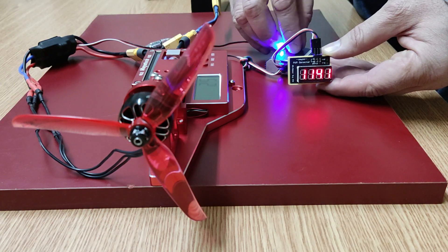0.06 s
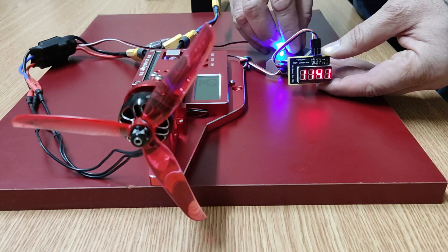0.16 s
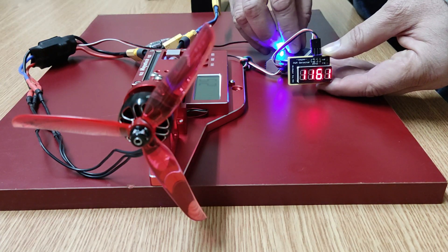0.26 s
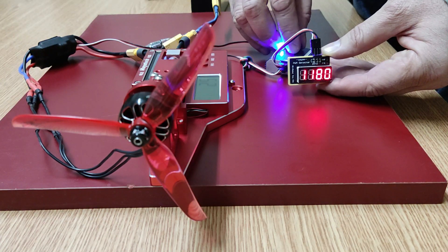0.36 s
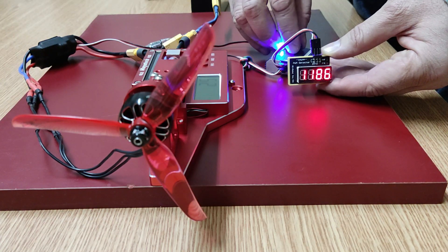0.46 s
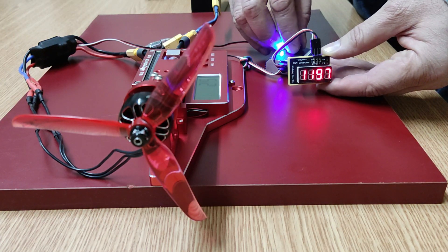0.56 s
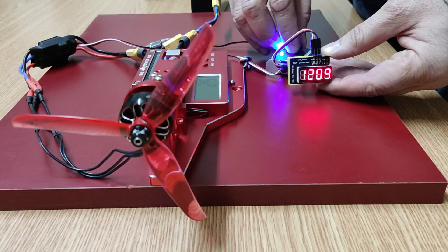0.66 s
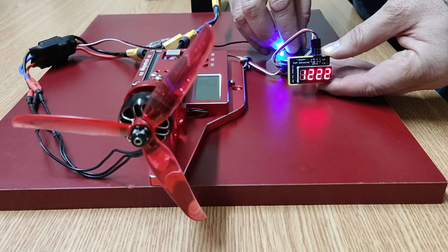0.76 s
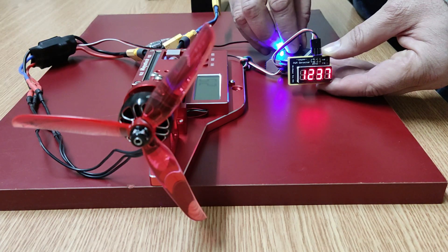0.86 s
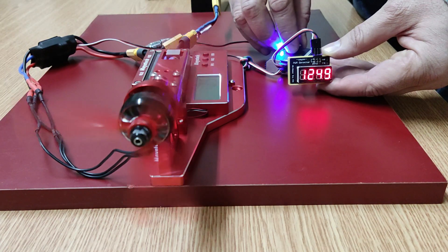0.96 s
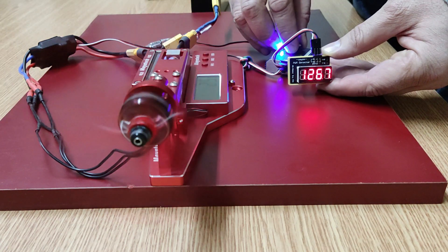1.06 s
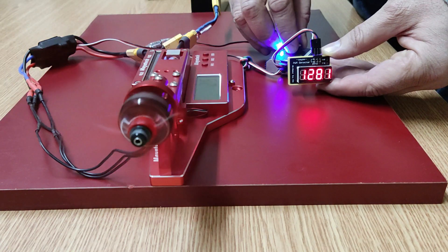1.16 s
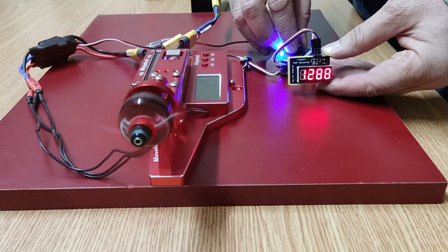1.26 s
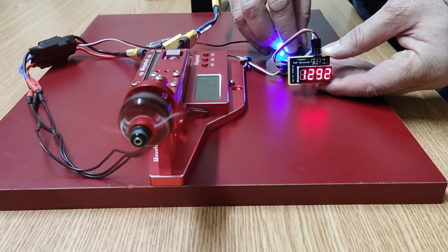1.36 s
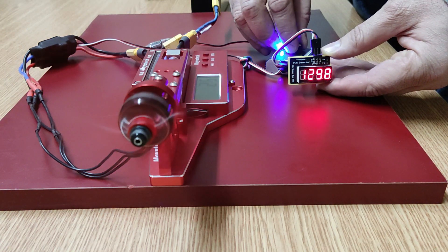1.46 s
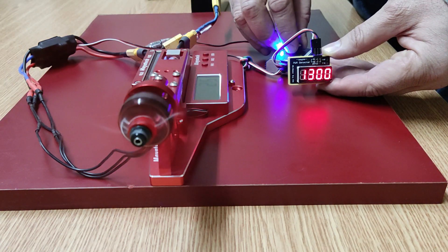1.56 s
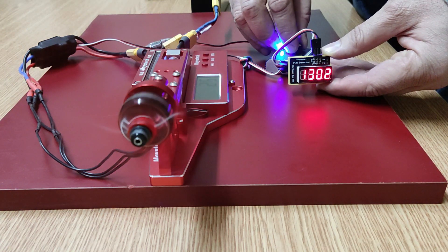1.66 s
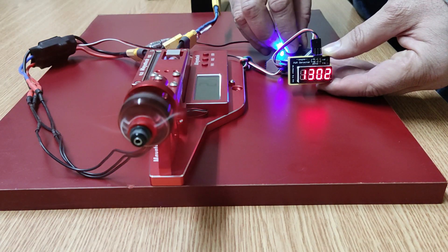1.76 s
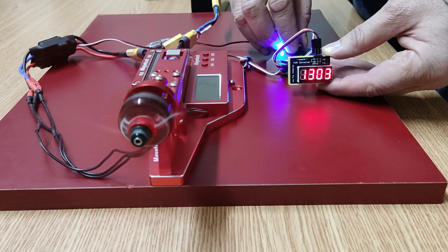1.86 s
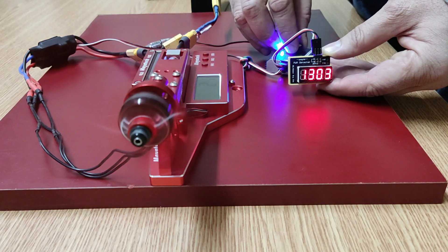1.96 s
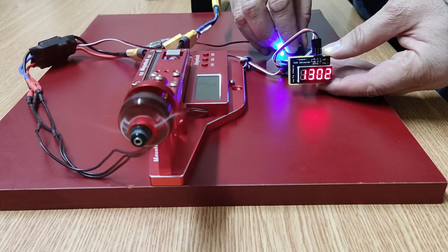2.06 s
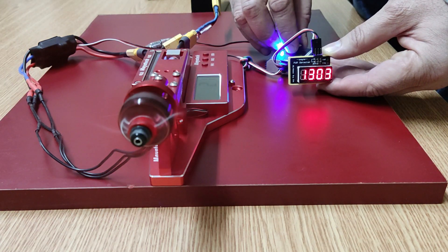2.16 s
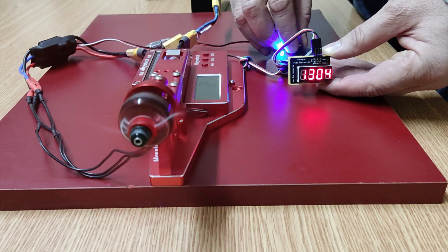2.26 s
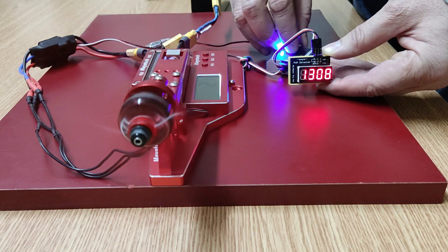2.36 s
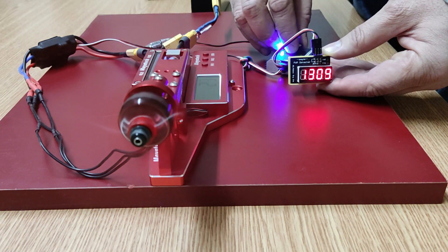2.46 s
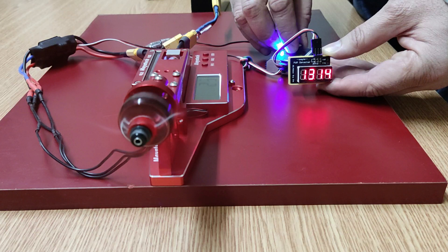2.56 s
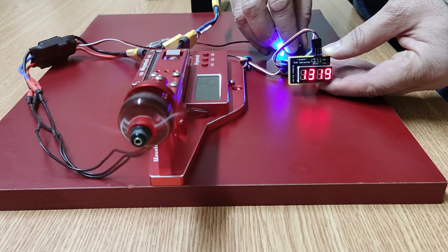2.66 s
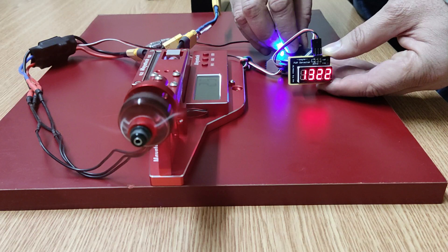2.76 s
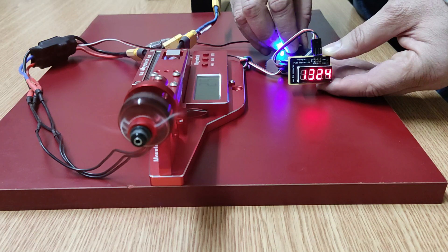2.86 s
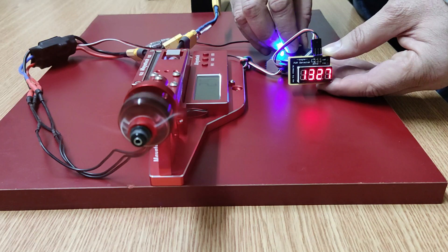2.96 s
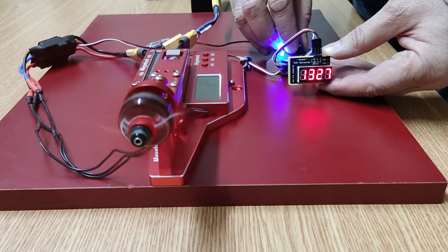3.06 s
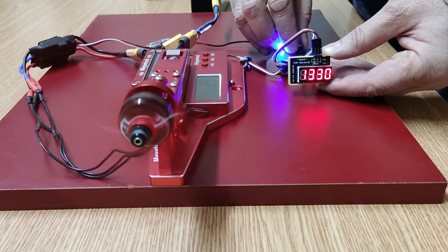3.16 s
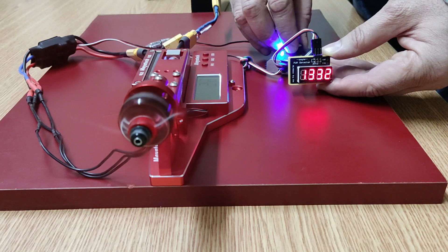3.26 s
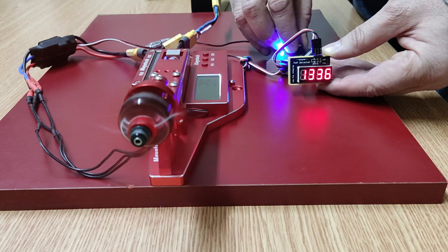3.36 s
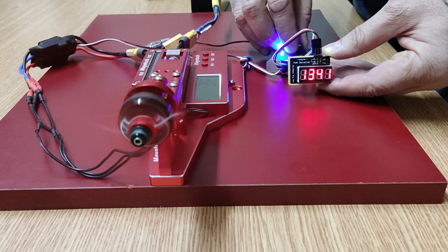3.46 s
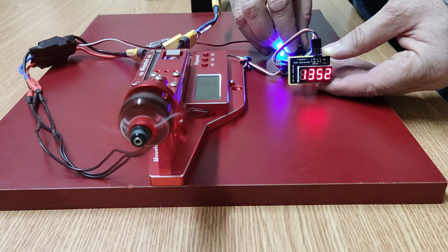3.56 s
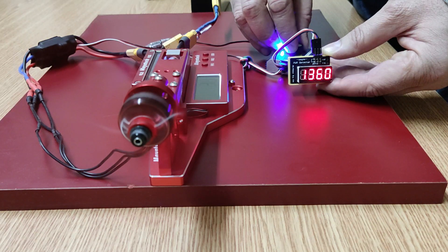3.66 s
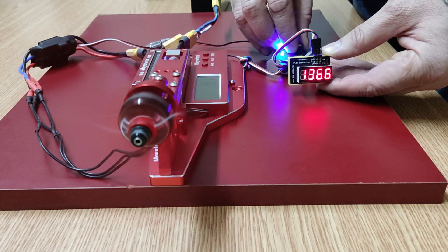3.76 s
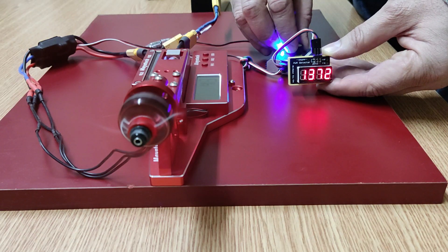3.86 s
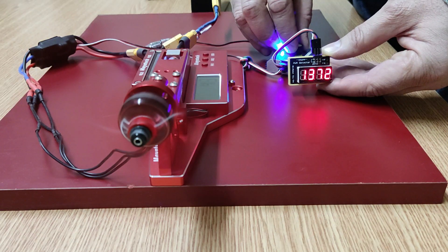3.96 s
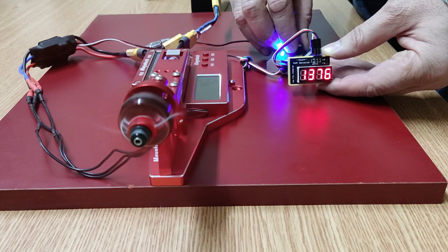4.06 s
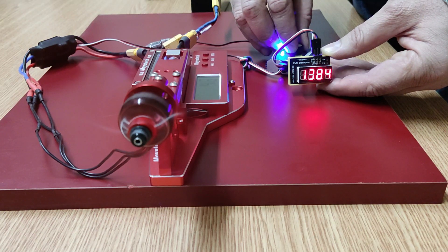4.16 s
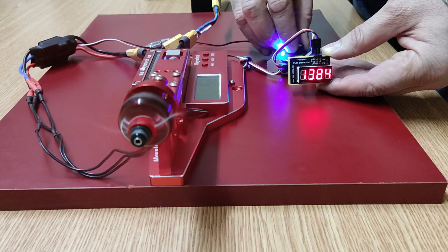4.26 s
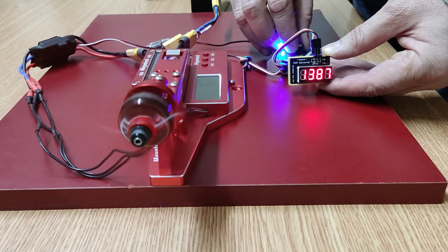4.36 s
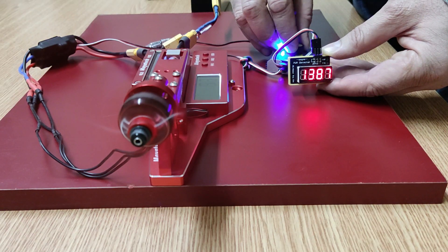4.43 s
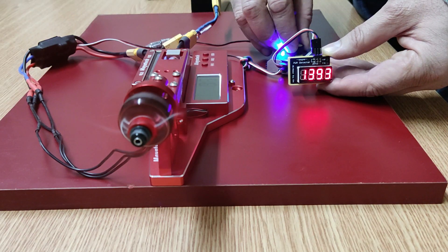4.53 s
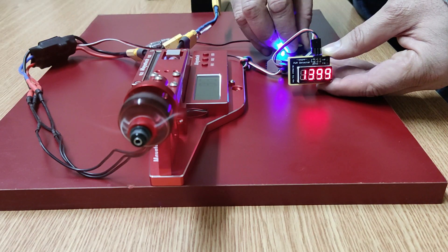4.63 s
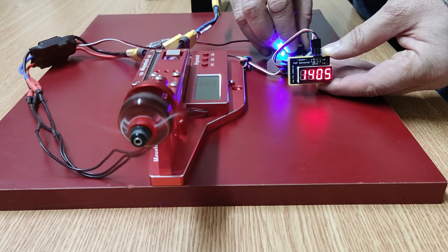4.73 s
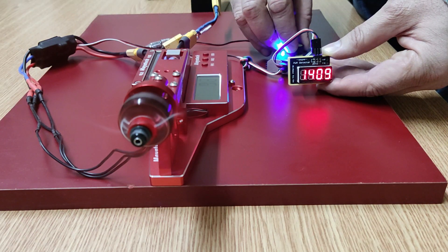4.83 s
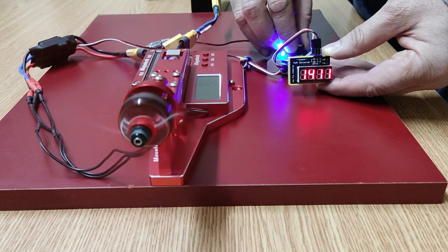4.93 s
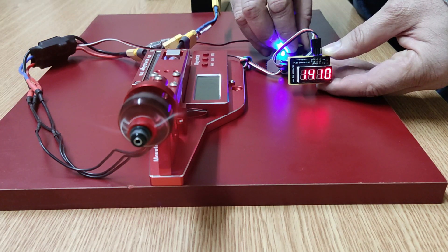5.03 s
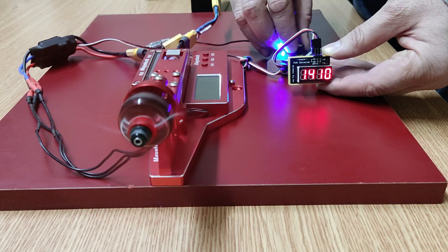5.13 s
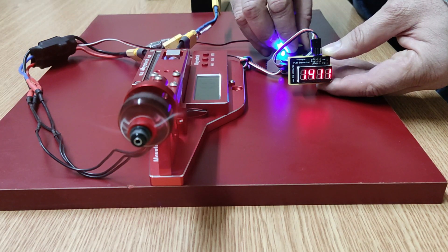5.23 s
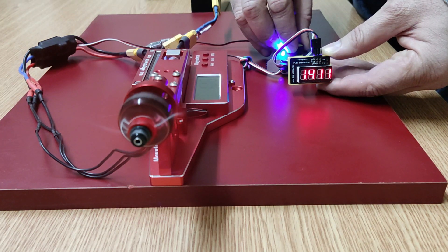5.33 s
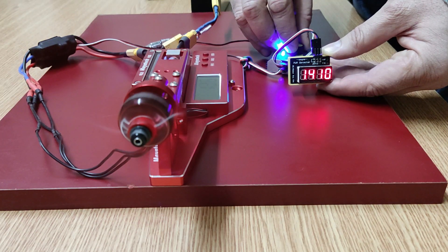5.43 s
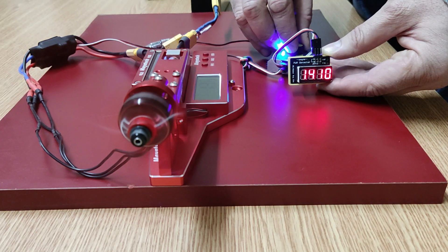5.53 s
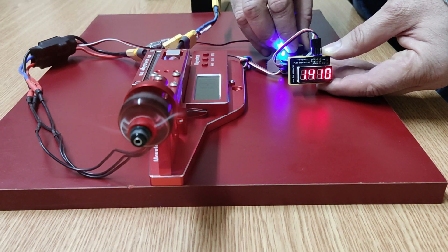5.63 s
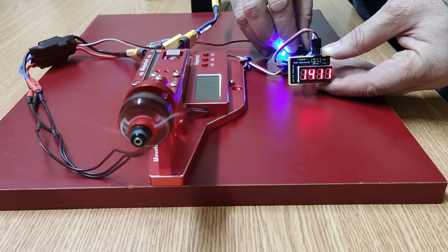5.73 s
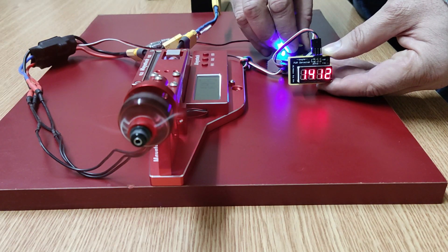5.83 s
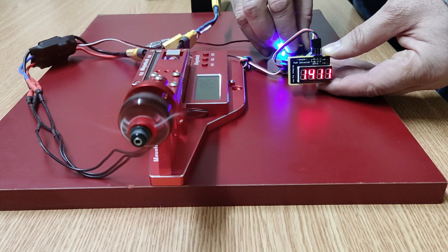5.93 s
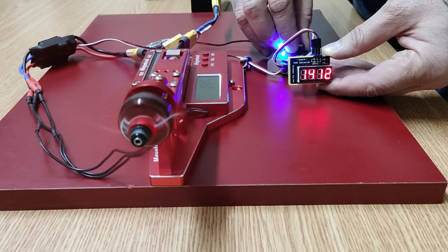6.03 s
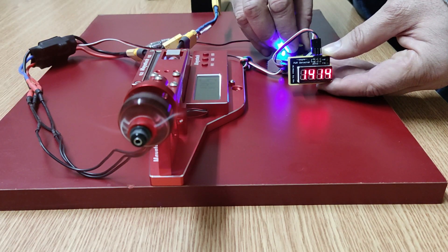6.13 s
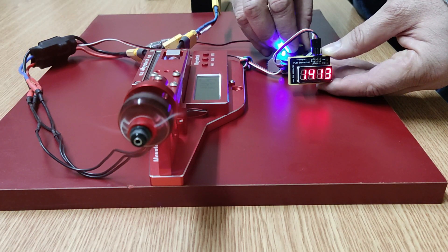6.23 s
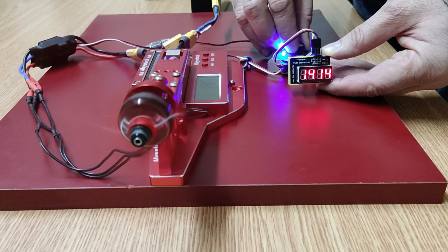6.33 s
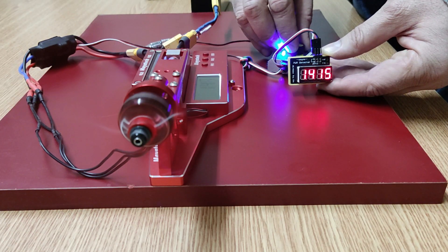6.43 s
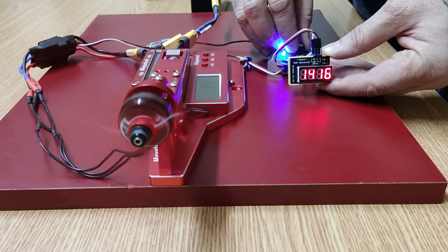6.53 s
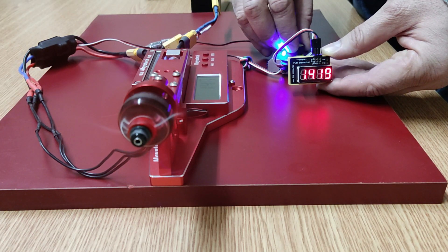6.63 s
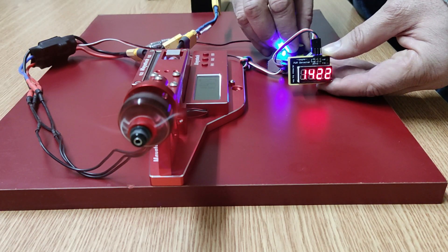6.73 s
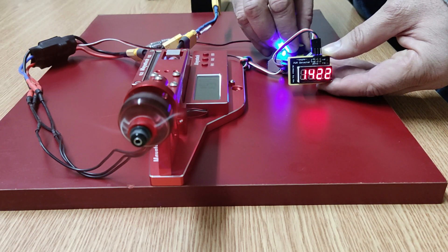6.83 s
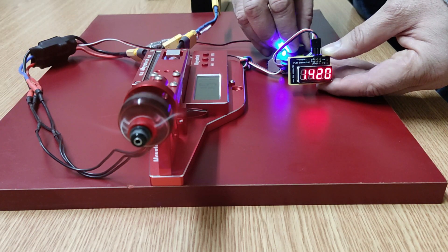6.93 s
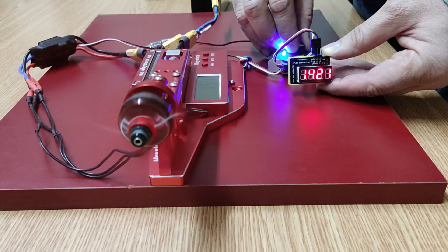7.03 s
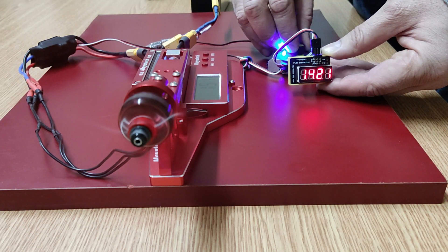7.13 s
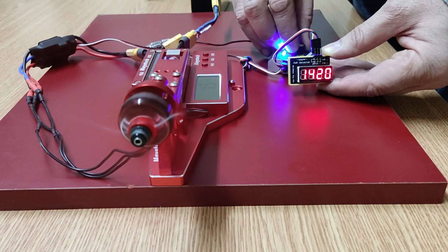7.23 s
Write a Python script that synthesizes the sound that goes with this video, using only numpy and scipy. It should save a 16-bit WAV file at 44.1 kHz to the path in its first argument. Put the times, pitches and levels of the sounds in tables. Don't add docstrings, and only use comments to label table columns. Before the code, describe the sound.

Near silence in a small room, then a little brushless motor ticks, shudders and snaps into rotation close to the microphone. A high, gritty controller squeal stays almost fixed in pitch while gliding tones around it rise with speed. The propeller adds a low throb, dull wash over the stand and increasingly strong airy hiss. After several seconds of climbing, it holds a shrill, windy high speed without winding down.

```python
import sys
import numpy as np
from scipy import signal
from scipy.fft import rfft, irfft, next_fast_len
from scipy.io import wavfile
from scipy.ndimage import uniform_filter1d

SR = 44100
rng = np.random.default_rng(int(sys.argv[2]) if len(sys.argv) > 2 else 0)


def store_wav(level_fs):
    pcm = np.round(np.clip(np.atleast_2d(level_fs), -1, 1) * 32767)
    wavfile.write(sys.argv[1], SR, pcm.T.astype(np.int16))


def undo_db(level):
    steps = np.asarray(level, float) / 20
    return 10 ** steps


N = 321489
SIZE = next_fast_len(N + 8192)
LOCK_S, THRUST_S = 1.341, 1.447


def level(x, db):
    return x * undo_db(db) / np.sqrt(np.mean(x ** 2))


def unit_power(gain):
    return gain / np.sqrt(np.mean(gain ** 2))


def walk(rate):
    knots = rng.standard_normal(int(N / SR * rate) + 3)
    place = np.arange(N) * rate / SR + rng.random()
    return 1.156 * np.interp(place, np.arange(len(knots)), knots)


def curves(table):
    s, *columns = np.transpose(table)
    return [np.interp(np.arange(N) / SR, s, c) for c in columns]


def bins():
    return np.maximum(np.fft.rfftfreq(SIZE, 1 / SR), 1)


def on_log(table):
    hz, *columns = np.transpose(table)
    return [np.interp(np.log(bins()), np.log(hz), c) for c in columns]


def pan(db):
    return undo_db(np.array([db, -db]) / 2)


def peak(hz, width):
    return 1 / (1 + ((bins() - hz) / (width / 2)) ** 2)


def shaped(x, gain):
    left_lag_s = .00015
    lag = np.exp(-2j * np.pi * bins() * left_lag_s * np.array([[1], [0]]))
    return irfft(rfft(x, SIZE) * gain * lag, SIZE)[:, :N]


def noise_pair(like):
    shared, *own = rng.standard_normal((3, N))
    like = np.clip(like, 0, 1)
    return np.sqrt(like) * shared + np.sqrt(1 - like) * np.array(own)


def tone(hz, db, pan_db, wobble_db, rate=14):
    cycles = np.cumsum(hz) / SR + rng.random()
    wave = np.sqrt(2) * np.sin(2 * np.pi * cycles) * (hz < 15900)
    loudness = undo_db(db + wobble_db * walk(rate))
    return wave * loudness * pan(pan_db + wobble_db * walk(.7 * rate))


def lines(turns, pitches, table, drive_db, wobble_db, rate=14):
    full_turns = 168
    octaves = np.log2(turns / full_turns)
    out = 0
    for hz, (db, pan_db, growth) in zip(pitches, table):
        out = out + tone(hz, db + growth * octaves + drive_db, pan_db, wobble_db, rate)
    return out


# start_s, speed_turns_per_s
THROTTLE = [(1.53, 60.2), (1.85, 68.8), (2.05, 71.7), (2.47, 73.2), (2.87, 87.4), (3.1, 94), (3.28, 95.8),
            (3.55, 103), (3.66, 109), (3.92, 126.8), (4.05, 132.5), (4.68, 151), (4.95, 161.8), (5.1, 164),
            (5.7, 165.3), (6.45, 168.2), (6.95, 173.5), (7.29, 173.9)]


def shaft(t):
    wake_s, wake_turns, drag_gain = 1.05, 15, 114
    snap_s, snap_gain = 1.33, 600
    overshoot_s, overshoot_turns, settle_s = 1.36, 15, .063
    inertia_s = .06
    running = uniform_filter1d(curves(THROTTLE)[0], int(inertia_s * SR), mode="nearest")
    since_lock = np.maximum(t - overshoot_s, 0)
    running = running + overshoot_turns * np.exp(-(since_lock / settle_s) ** 2)
    dragged = wake_turns + drag_gain * np.maximum(t - wake_s, 0)
    dragged = dragged + snap_gain * np.maximum(t - snap_s, 0)
    return np.minimum(dragged, running)


def law(turns, db, knee, below_db, above_db):
    idle_turns = THROTTLE[0][1]
    octaves = np.log2(np.maximum(turns, idle_turns) / knee)
    return db + np.where(octaves < 0, below_db, above_db) * octaves


# start_s, level_db
WAKE_CURRENT = [
    (1.045, -59),
    (1.056, -24),
    (1.1, -22),
    (1.17, -0.5),
    (1.22, -3.5),
    (1.339, -5),
]
# start_s, level_db
LOCK_CURRENT = [
    (1.339, -17),
    (1.343, 3),
    (1.363, 7),
    (1.368, -5.5),
    (1.442, -2),
    (1.452, 4),
    (2.2, 3),
]


def efforts(t, turns):
    current = np.where(t < LOCK_CURRENT[0][0], curves(WAKE_CURRENT)[0], curves(LOCK_CURRENT)[0])
    asleep = np.minimum(current - WAKE_CURRENT[1][1], 0)
    ripple = np.interp(turns, [137, 159], [0, -11.5]) - 0.05 * np.maximum(turns - 159, 0)
    jolt_end_s = 1.369
    jolt = 1.3 * np.maximum(current, 0) * (t < jolt_end_s)
    idle_db, bite_s = -19, .02
    idle = idle_db * np.clip((THRUST_S - t) / bite_s + .5, 0, 1)
    board_turns, board_width_turns, board_db = 154, 3, 7.5
    board = board_db / (1 + ((turns - board_turns) / (board_width_turns / 2)) ** 2)
    chop_db = -2.4 + current + ripple
    rattle_db = law(turns, -23, 102.5, 11.5, -3.5) + current + jolt
    hiss_db = law(turns, -18, 125.5, 16.5, -1.5) + idle + asleep
    wash_db = law(turns, -36, 107.5, 10, -3.5) + 0.31 * (current + jolt) + asleep + board
    return chop_db, rattle_db, hiss_db, wash_db


SIDEBAND_ORDERS = [-28, -14, -7, -3, -2, -1, 0, 1, 3, 6, 8, 10, 11, 12, 13, 14, 17, 21, 28, 39, 42]
# level_db, left_minus_right_db, growth_db_per_octave of speed
SIDEBAND_LEVELS = [(-45.4, -2.9, 5.2), (-33.7, -5.0, -1.3), (-57.0, -7.5, -4.2), (-29.4, 3.6, 3.3),
                   (-52.8, -0.7, -0.3), (-36.3, 6.0, 5.5), (-19.5, 21.5, 7.5), (-54.0, -11.0, -2.8),
                   (-37.7, 4.5, 5.9), (-36.5, 9.0, 11.0), (-58.3, -7.9, 0.4), (-55.9, 3.1, -3.0),
                   (-42.7, -11.9, 1.3), (-45.4, -9.9, 4.4), (-58.3, -5.5, -10.7), (-22.3, -1.4, 3.0),
                   (-53.2, -12.7, -1.4), (-42.8, -1.9, 8.6), (-63.7, -0.8, -15.3), (-59.8, -2.3, -3.7),
                   (-62.0, -1.9, -13.9)]
# chop_multiple, offset_hz, shaft_order
CHOP_BEATS = [(.5, -17, 14), (1.5, 17, 14), (1.5, 17, 42), (2, 0, -14), (2, 0, -42)]
# level_db, left_minus_right_db, growth_db_per_octave
BEAT_LEVELS = [(-49.5, -22.5, -1), (-53.5, -33.5, -3.5), (-40.5, -11, 3), (-41, -15, 16), (-63, -8, 22)]


def whine(turns, chop, chop_db):
    sideband_hz = [chop + order * turns for order in SIDEBAND_ORDERS]
    beat_hz = [multiple * chop + hz + order * turns for multiple, hz, order in CHOP_BEATS]
    sidebands = lines(turns, sideband_hz, SIDEBAND_LEVELS, chop_db, 1.16)
    return sidebands + lines(turns, beat_hz, BEAT_LEVELS, chop_db + 1.5, 0.79)


# start_s, level_db
CRAWL_TONE = [
    (1.1, -90),
    (1.15, -55),
    (1.33, -52),
    (1.36, -56),
    (1.4, -62),
    (1.6, -62),
    (1.9, -90),
]
SHAFT_ORDERS = [1, 2, 3, 6, 9, 12, 13, 14, 15, 16, 18, 21, 24, 27, 28, 30, 42, 56, 70, 84]
# level_db, left_minus_right_db, growth_db_per_octave
ORDER_LEVELS = [(-55, 15.5, 18), (-61.5, 9, 13), (-42.5, 6.5, 11.5), (-50.5, 10.5, 9.6), (-48, 4.5, 12.2),
                (-40, 0, 17.4), (-47.5, -6, 15), (-32.5, 4, 13.2), (-41.5, 7.5, 18.7), (-48, 16.5, 25),
                (-48.5, 9.5, 15.5), (-43.5, 8.5, 11), (-46, 1, 16), (-46.5, -14, 23), (-40.5, 9, 15.2),
                (-44, 15, 22), (-36.5, 13.5, 14), (-44.5, 6, 4.9), (-52.5, 3, 12), (-46, -2, 5.4)]


def orders(turns, locked_db, crawl_db):
    crawl = tone(14 * turns, crawl_db, 0, 5.0, 40)
    order_hz = [order * turns for order in SHAFT_ORDERS]
    return crawl + lines(turns, order_hz, ORDER_LEVELS, locked_db, 2.2, 70)


# pitch_hz, width_hz, left_db, right_db
BELL_MODES = [(152, 14, 9, 9), (1190, 110, 7, 7), (1720, 110, 6, 4), (2200, 120, 3, 3), (2000, 250, -4, -4),
              (9500, 500, 5, 5), (13400, 700, 9, 9), (160.0, 150.0, -8.7, 7.3), (400.0, 100.0, 1.7, 5.8),
              (1260.0, 370.0, -3.4, 3.8), (1770.0, 370.0, -1.9, -3.0), (2320.0, 170.0, 9.6, 5.7),
              (2570.0, 240.0, 5.8, 1.7), (3660.0, 570.0, 3.0, -4.5), (4750.0, 330.0, 3.4, 0.1),
              (5610.0, 960.0, -4.5, -4.8), (6670.0, 250.0, -8.8, 2.9), (7490.0, 220.0, -13.0, 1.3),
              (7820.0, 480.0, -9.2, 12.1), (8290.0, 260.0, -0.2, 12.9), (8730.0, 430.0, -4.9, 8.6),
              (9760.0, 980.0, -6.9, 2.3), (10500.0, 200.0, 2.0, -13.8), (10830.0, 960.0, 17.5, 0.1),
              (11480.0, 690.0, 18.0, 11.6), (11690.0, 330.0, 1.9, 0.2), (14610.0, 2210.0, 1.5, -41.8)]


def bell(x):
    db = 0
    for hz, width, left_db, right_db in BELL_MODES:
        db = db + np.array([[left_db], [right_db]]) * peak(hz, width)
    return shaped(x, undo_db(db))


# pitch_hz, width_hz, level_db, left_minus_right_db
RATTLE_MODES = [(386, 430, -20, -17), (1210, 39, -25, 15), (1625, 74, -12.5, 2), (2193, 17, -3, -8),
                (2582, 90, -2.5, -11.5), (3850, 1860, -5.5, -7.5), (4650, 550, -8.5, -11.5),
                (6010, 540, -10.5, -20), (7050, 200, -22, -7), (7700, 580, 2.5, 13.5),
                (8380, 1160, 5, -16.5), (11060, 1200, -0.5, 16), (15400, 1300, -23, -17)]
# start_s, level_db (peak), length_s
TIMING_TICKS = [
    (1.057, -39, .004),
    (1.085, -34, 0.0036),
    (1.1, -32, .002),
    (1.107, -29, .002),
    (1.112, -31, 0.002),
    (1.122, -42, 0.0021),
    (2.507, -46.5, 0.0069),
]


def rattle(rattle_db):
    t = np.arange(N) / SR
    push = undo_db(rattle_db + 2.0 * walk(40))
    for s, db, length in TIMING_TICKS:
        fade_s = np.where(t < s, .0004, length)
        push = push + undo_db(db) * np.exp(-np.abs(t - s) / fade_s)
    power = 0
    for hz, width, db, pan_db in RATTLE_MODES:
        power = power + undo_db(2 * db) * pan(pan_db)[:, None] ** 2 * peak(hz, width) ** 2
    return shaped(noise_pair(0.18) * push, unit_power(np.sqrt(power)))


# start_s, level_db
COGGING = [
    (1.048, -90),
    (1.06, -55),
    (1.17, -41.5),
    (1.25, -55),
    (1.33, -54),
    (1.35, -52),
    (1.37, -49),
    (1.52, -49),
    (1.9, -86),
]
# pitch_hz, width_hz, level_db
STAND_MODES = [(153, 37, -4), (226, 37, 0), (1210, 40, -4), (1700, 35, 3), (2520, 33, -0.5)]


def shudder():
    (shake_db,) = curves(COGGING)
    power = sum(undo_db(2 * db) * peak(hz, width) ** 2 for hz, width, db in STAND_MODES)
    return shaped(noise_pair(0.72) * undo_db(shake_db), unit_power(np.sqrt(power)))


def air(table, centres, drive_db, throb, like):
    db, pan_db = on_log(table)
    gain = unit_power(undo_db(db) * pan(pan_db))
    inside = np.clip(bins(), centres[0], centres[-1])
    out, swell = 0, walk(4.5)
    for hz in centres:
        share = np.cos(np.pi / 2 * np.clip(np.log2(inside / hz), -1, 1))
        flicker = undo_db(drive_db + .5 * swell + .8 * walk(12) + 1.2 * walk(300))
        out = out + flicker * throb * shaped(noise_pair(like), gain * share)
    return out


# pitch_hz, level_db (per Hz), left_minus_right_db
BLADE_HISS = [(2000, -29.5, 8), (3270, -42, -36), (3600, -19, 12), (4660, -34, 12), (4940, -10, -3.5),
              (6200, -8, 0.5), (7930, -4.5, -10.5), (8560, -1.5, -12.5), (9030, -1, -4.5),
              (10640, -3, 13.5), (11600, -5.5, 5.5), (13500, -15.5, 4), (14950, -16.5, 7),
              (16100, -49.5, -10)]
# pitch_hz, level_db (per Hz), left_minus_right_db
STAND_WASH = [(30, -8.5, 4), (89, -3.5, 5), (161, -4, -17), (248, -2, 6), (500, -2.5, -5), (905, 0.5, 2),
              (1770, 0, -7.5), (2360, 3, 0), (3100, 1, 0.5), (4100, -19.5, 32)]


def blades(turns, hiss_db, wash_db):
    turn = 2 * np.pi * np.cumsum(turns) / SR
    throb = 1 + 0.027 * np.cos(turn) + 0.092 * np.cos(2 * turn) + 0.043 * np.cos(3 * turn)
    hiss = air(BLADE_HISS, [3000, 6000, 12000], hiss_db, throb, 0.065)
    wash = air(STAND_WASH, [125, 250, 500, 1000, 2000], wash_db, throb, 0.49)
    return hiss + wash


# pitch_hz, level_db (per Hz)
ROOM_NOISE = [(12, -14.5), (22, -13), (60, -26), (180, -34), (430, -38.5), (497, -34), (545, -43),
              (2000, -48.5), (5000, -52), (7800, -53.5), (8700, -47), (9600, -52), (12000, -54),
              (14500, -62), (15800, -69)]


def room():
    noise = shaped(noise_pair(0.078), undo_db(on_log(ROOM_NOISE)[0]))
    return level(noise * undo_db(0.87 * walk(9.9)), -57)


def scene():
    t = np.arange(N) / SR
    turns = shaft(t)
    chop = 7827.8 - .878 * turns
    chop_db, rattle_db, hiss_db, wash_db = efforts(t, turns)
    turns = turns * (1 + 0.000743 * walk(25))
    locked_db = np.where(t > LOCK_S, 0, -90)
    before_thrust_db = -3.6 * (t < THRUST_S)
    tones = whine(turns, chop, chop_db + locked_db)
    tones = tones + orders(turns, locked_db + before_thrust_db, curves(CRAWL_TONE)[0])
    return bell(tones) + rattle(rattle_db) + shudder() + blades(turns, hiss_db, wash_db) + room()


def roll_off(x):
    return signal.sosfilt(signal.butter(12, 15990, fs=SR, output="sos"), x)


def record(dry):
    ceiling = .95
    soft = dry / (1 + np.abs(dry / ceiling) ** 6) ** (1 / 6)
    return roll_off(soft)


dry = scene()
out = record(dry)
store_wav(out)
```